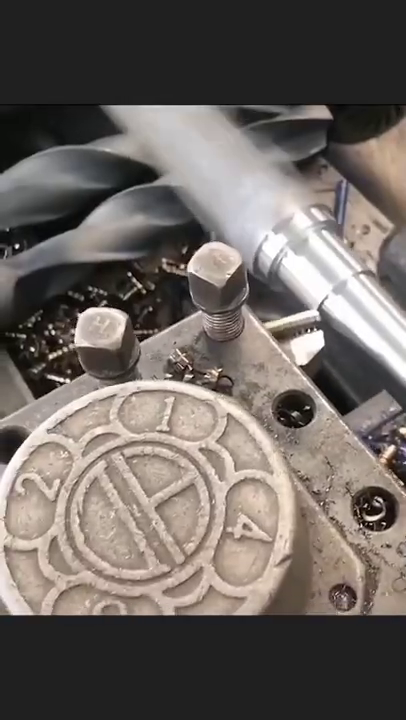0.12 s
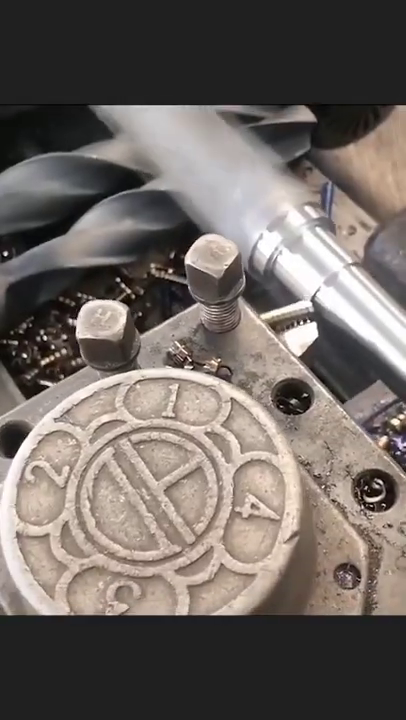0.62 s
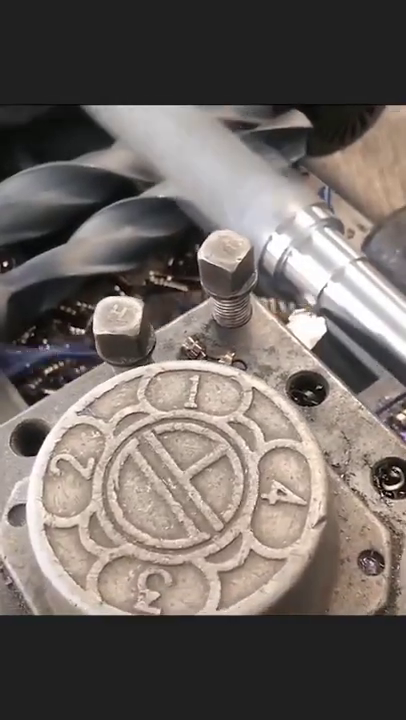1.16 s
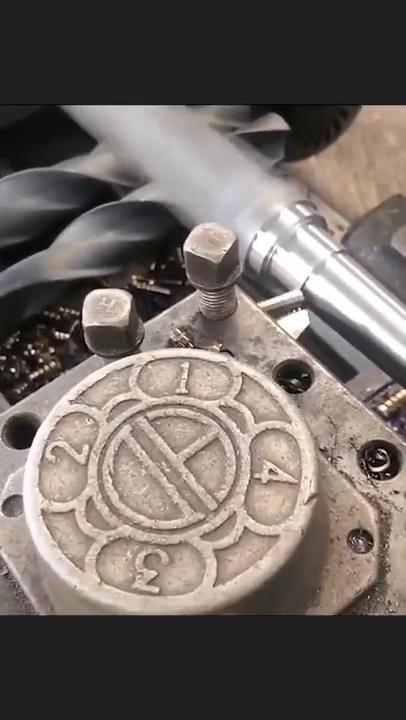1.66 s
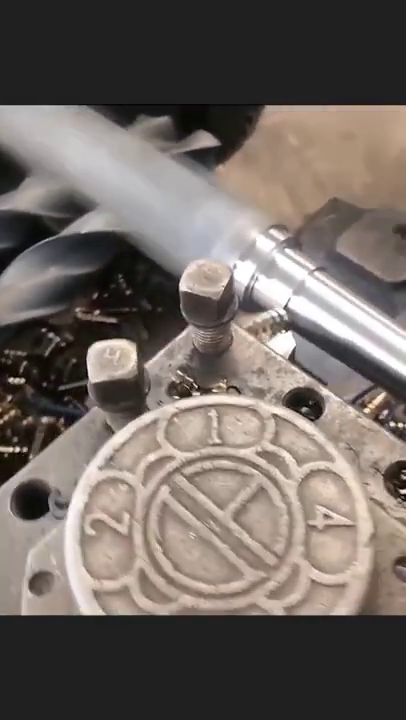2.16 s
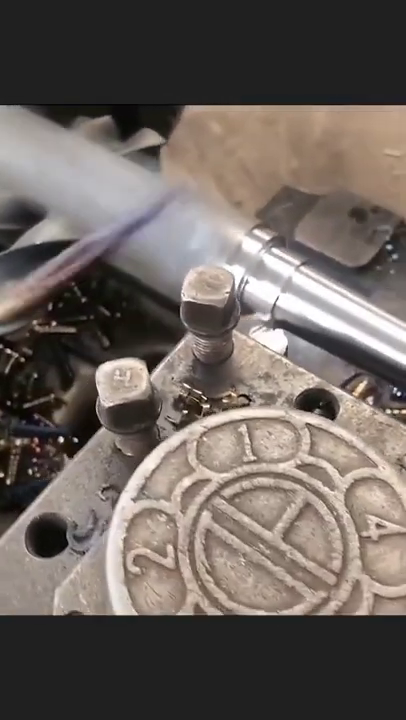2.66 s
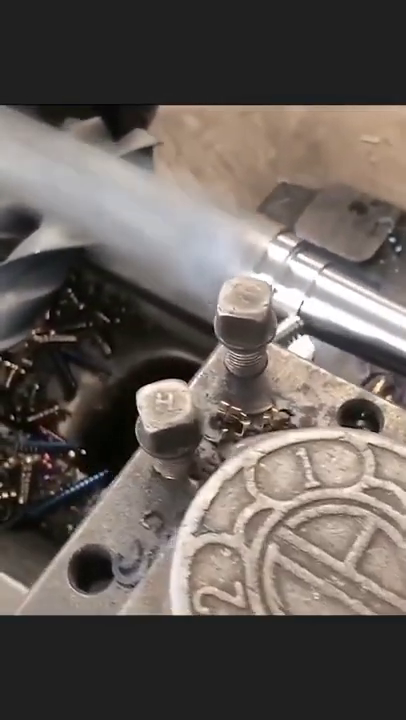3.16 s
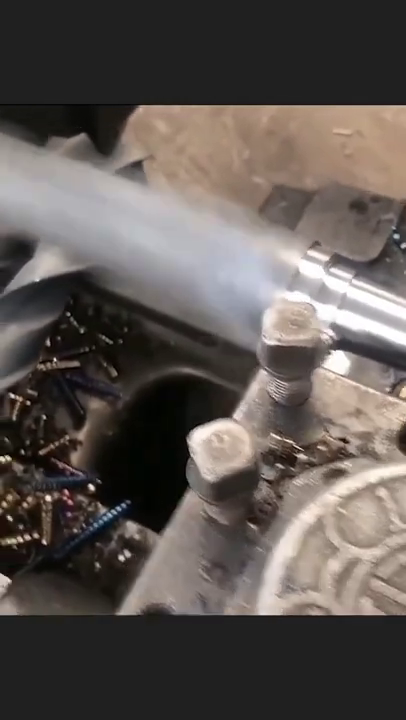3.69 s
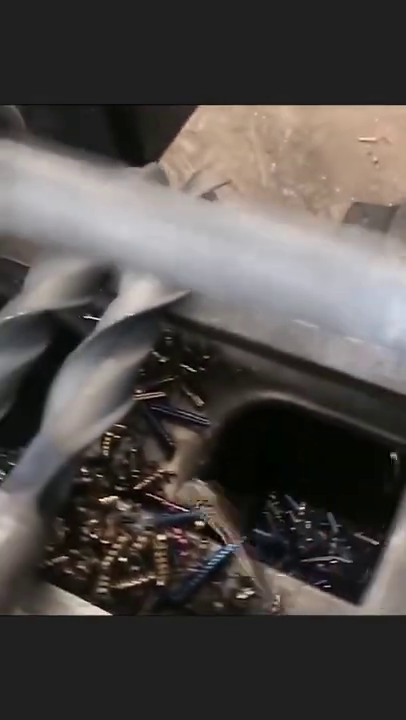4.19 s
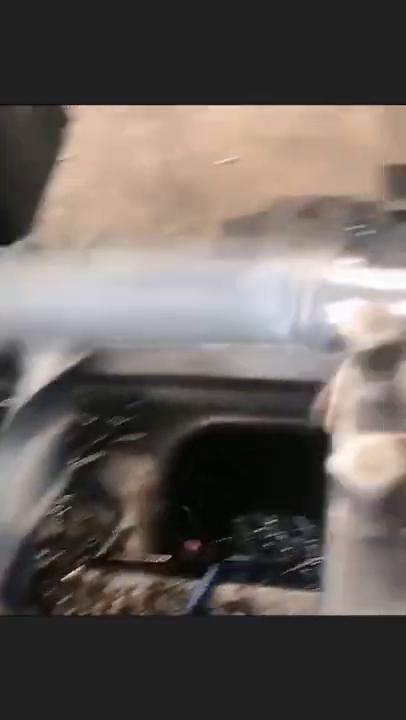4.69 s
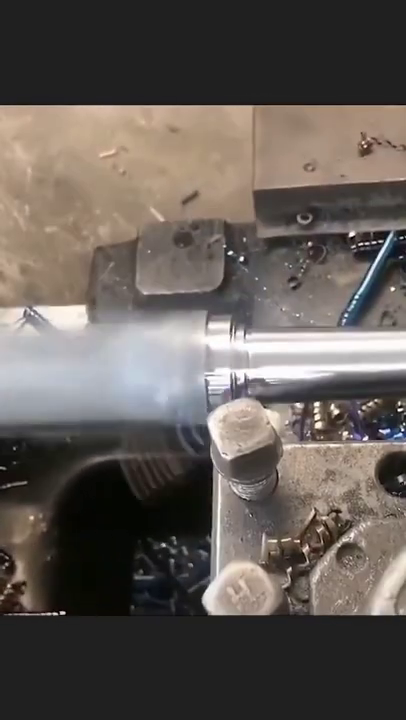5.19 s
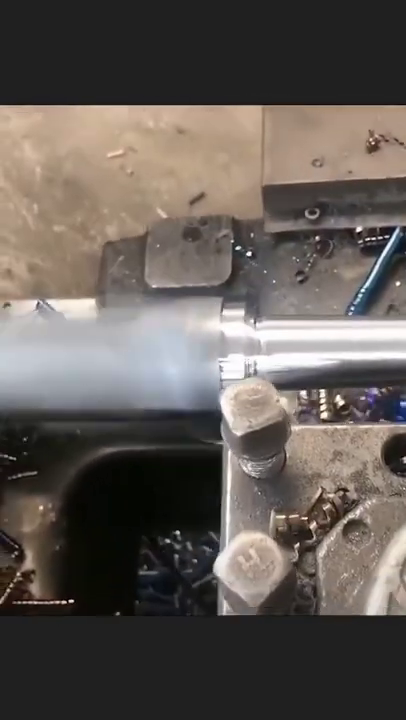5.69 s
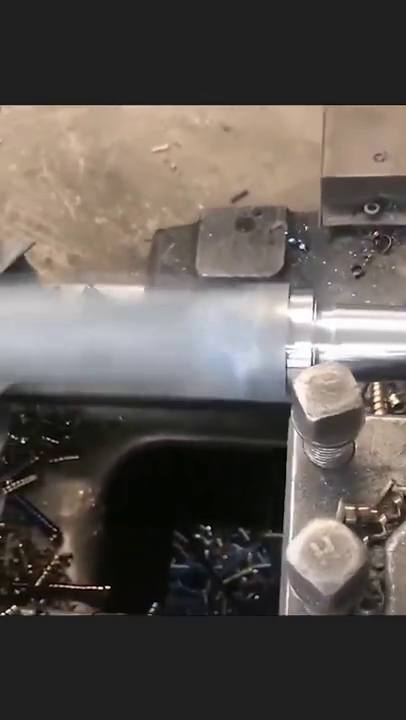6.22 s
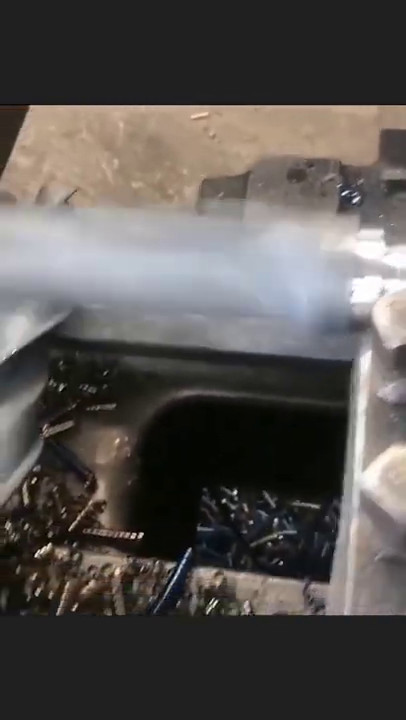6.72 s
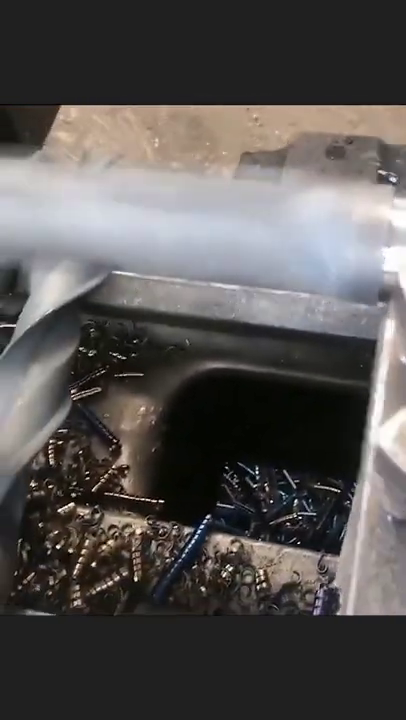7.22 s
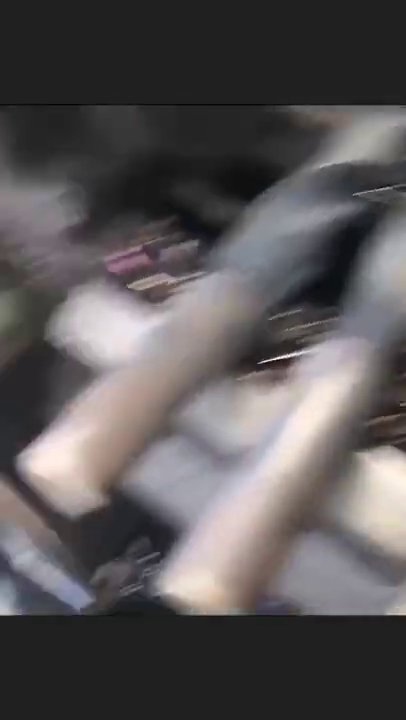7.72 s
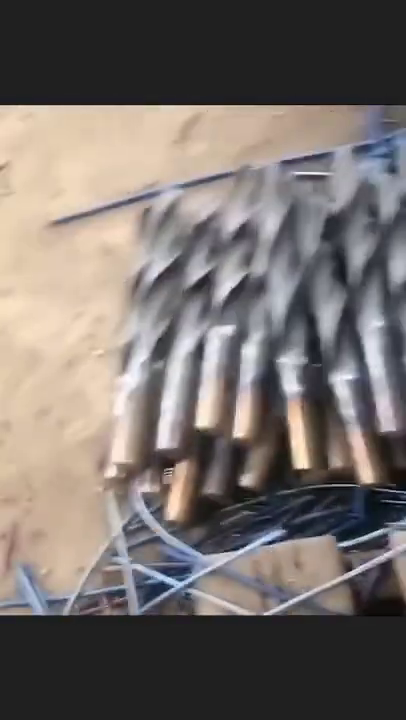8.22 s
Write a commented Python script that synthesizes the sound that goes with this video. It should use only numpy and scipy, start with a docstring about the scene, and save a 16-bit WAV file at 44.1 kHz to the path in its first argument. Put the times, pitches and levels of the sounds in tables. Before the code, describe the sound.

Close to a lathe in an industrial workshop, a tool squeals on a steel drill shank, very high and fast-throbbing, with sudden sharp bites. The squeal fades as machine roar and gear whine grow, then abruptly returns louder and steadier while the background drops. It stops quickly, leaving rumble, rattle and a few clinking chips; finally the shop grows louder with dull knocks and a ringing scrape.

```python
"""Lathe turning a steel drill shank

The tool squeals near 5 kHz, throbbing with the spindle and the two flutes of the drill; it fades, bites again
steadily and leaves the work. The squeal is a gliding carrier under a throb envelope with sudden bites on top.
Chips clink as decaying sines, loose parts rattle as noise bursts. Roar, casings, gear whines and a late
scrape are shaped noise and randomly pushed modes, held lower while the squeal is loud.
"""
import sys
import numpy as np
from scipy import signal
from scipy.fft import rfft, irfft
from scipy.io import wavfile
from scipy.ndimage import uniform_filter1d, minimum_filter1d

SR = 44100
rng = np.random.default_rng(int(sys.argv[2]) if len(sys.argv) > 2 else 0)


def master(y):
    """Save y as 16-bit WAV."""
    cut = np.clip(np.atleast_2d(y).T, -1, 1)
    pcm = np.round(cut * 32767)  # scale
    wavfile.write(sys.argv[1], SR, pcm.astype(np.int16))


def natural_amplitude(level_db):
    """Convert a level in decibels to a linear amplitude factor, elementwise."""
    exponent = np.asarray(level_db, float) / 20
    return 10 ** exponent


N = 368676  # samples, 8.36 s

# squeal: (time [s], pitch [Hz], level [dB])
SQUEAL = [(0.0, 5062, -14.5), (0.3, 5062, -15), (0.74, 5057, -17), (0.88, 5058, -11.5), (1.06, 5048, -17),
          (1.22, 5048, -14.5), (1.4, 5050, -17), (2.07, 5062, -18), (2.25, 5058, -19), (2.6, 5060, -19.5),
          (2.79, 5080, -27), (2.92, 5068, -19.5), (3.05, 5075, -24.5), (3.5, 5112, -27), (4.05, 5118, -29),
          (4.3, 5135, -27), (4.65, 5128, -32), (4.85, 5130, -31), (5.08, 5115, -37), (5.102, 4985, -8.5),
          (5.125, 4960, -8.5), (5.24, 4982, -8.5), (5.37, 4992, -8.5), (5.4, 5008, -8.5),
          (5.44, 4998, -8.5), (5.52, 4934, -8.5), (5.63, 4942, -8.5), (5.83, 4980, -8.5),
          (5.88, 4975, -8.5), (6.11, 5010, -9), (6.16, 5020, -10), (6.185, 5085, -12), (6.205, 5075, -25),
          (6.27, 5050, -36), (6.34, 5045, -47), (6.45, 5035, -50), (6.75, 5030, -61), (6.9, 5030, -90)]
# contact of tool and work: (time [s], throb depth [0-1], run-out share [0-1], unsteady share of ringing [0-1],
# pitch wobble scale [Hz], holder ring against the squeal [dB])
CONTACT = [(0, .24, .3, .1, 15, -23), (.9, .3, .3, .12, 19, -22), (1.3, .33, .6, .14, 16, -21),
           (1.9, .42, .75, .22, 17, -20), (2.2, .3, .3, .3, 19, -22), (2.7, .3, .6, .4, 18, -22),
           (3.4, .3, .4, .3, 17, -32), (5.08, .26, .4, .3, 16, -34), (5.1, .08, .3, .003, 9, -36),
           (5.4, .08, .3, .005, 9, -32), (5.6, .08, .3, .008, 5, -32), (6.05, .12, .3, .02, 9, -31),
           (6.17, .27, .3, .07, 12, -34), (6.21, .2, .3, .27, 10, -32), (6.3, .1, .3, 1, 3, -32)]
# unsteady ringing and drag: (time [s], offset from the squeal pitch [Hz], pitch sag on a bite [Hz])
DRAG = [(0, -15, 8), (.9, 0, 8), (2.2, 5, 8), (3.3, -35, 55), (5.08, -35, 55), (5.1, 0, 5), (8.36, 0, 5)]
# sudden bites of the tool: (time of peak [s], peak of envelope [dB])
BITES = [(0.053, -25), (0.096, -25.5), (0.169, -25), (0.242, -20), (0.421, -20), (0.794, -21),
         (0.837, -28.5), (0.863, -16.5), (0.904, -16), (0.932, -16.5), (1.127, -21), (1.160, -9.5),
         (1.201, -22), (1.273, -24.5), (1.528, -18.5), (1.645, -22), (1.791, -23.5), (1.865, -21.5),
         (1.958, -22.5), (2.111, -17.5), (2.159, -18.5), (2.221, -14.5), (2.276, -18.5), (2.3082, -22.5),
         (2.3484, -15), (2.372, -17), (2.394, -14.5), (2.417, -16), (2.462, -14), (2.487, -14.5),
         (2.527, -23), (2.5638, -16.5), (2.605, -17.5), (2.63, -12), (2.683, -13.5), (2.748, -14.5),
         (2.819, -14.5), (2.844, -10.5), (2.895, -16), (2.92, -17.5), (2.977, -14), (3, -10), (3.1156, -13),
         (3.158, -18), (3.188, -18.5), (3.22, -20), (3.2655, -17.5), (3.555, -24.5), (3.703, -17),
         (3.854, -22), (3.922, -28.5), (4.036, -25), (4.216, -24), (4.325, -27.5), (4.354, -27.5),
         (4.398, -25), (4.472, -26.5), (4.533, -29.5), (4.766, -28), (6.246, -21.5)]
# rubbing at the tool tip: (frequency [Hz], relative density [dB per Hz])
FIZZ = [(7500, -24), (8200, 0.5), (9700, -7.5), (11000, -22.5), (13500, -26.5), (14600, -12.5),
        (15550, -5.5)]
# hard spot passing the tool: turns counted from SNAG_S, envelope peak of each [dB]
SNAG_TURN = (-2, -1, 0, 1, 2, 3, 4, 6, 7, 8)
SNAG_DB = (-48, -43, -36, -45, -45, -45, -43, -41, -49, -51)
# clear chip clinks: (time [s], ring [Hz], level before rise and decay [dB])
CLEAR_CLINKS = [(6.98, 5800, -39), (6.99, 6200, -40), (7.0, 6050, -39), (7.03, 5960, -39),
                (7.07, 6300, -50), (6.99, 8100, -43), (7.595, 7610, -32), (7.6, 9050, -39),
                (7.6, 4800, -40), (8.225, 5150, -38)]
# rattle colour: (frequency [Hz], relative density [dB per Hz])
RATTLE_COLOUR = [(1500, -10), (2500, 4), (3000, 2), (3600, -5), (4300, -15), (6000, -32)]
# rattle level: (time [s], level against SHOP [dB])
RATTLE_LEVEL = [(0, -16), (2, -16), (3.9, -15), (4.3, -16.5), (5.08, -13), (5.2, -15.5), (6.2, -14),
                (7.5, -17.5), (8.36, -10.5)]
# dull knocks in the shop: (onset [s], peak of burst envelope [dB])
KNOCKS = [(7.745, -24), (7.762, -21), (7.795, -25), (8.149, -19)]
# reference level of the shop: (time [s], level [dB])
SHOP = [(0, -27), (1.55, -24.5), (2.2, -21), (3.05, -20.5), (3.95, -15.5), (5.0, -15.5), (5.085, -14),
        (5.115, -25.5), (5.9, -27.5), (6.45, -27.5), (7.95, -16.5), (8.36, -17.5)]
# machine noise spectra: (frequency [Hz], relative density [dB per Hz])
ROAR = [(240, -39), (400, -2), (484, -6.5), (580, -1.5), (719, 0.5), (994, 5), (1130, 4), (1700, 0.5),
        (1870, 4), (2240, -4), (2750, -5.5), (3850, -16), (7000, -56), (9100, -59), (15400, -120)]
RUMBLE = [(12, -59), (20, -23.5), (130, -12), (189, -4), (328, -2), (358, -2), (428, -6), (603, -1),
          (700, -11), (910, -30.5), (1540, -120)]
HISS = [(3290, -5.5), (5600, 1.5), (7300, -3.5), (8270, -0.5), (8860, -3), (10000, -3.5), (11500, -10),
        (11900, -11.5), (14600, -16.5), (15600, -25)]
# casings and gear meshes: (frequency [Hz], single-pole width [Hz], mid-turn level against SHOP [dB],
# half the gain on turning from lathe to shop [dB])
CASINGS = [(94, 67, -25.5, 0), (142, 47, -28.5, 6), (196.6, 20, -21.5, -1.5), (253.7, 19, -22, -4.5),
           (365.5, 35, -18, -0.5), (517.2, 57, -19.5, -8.5), (568.6, 60, -18, -1), (600, 12, -20.5, 3),
           (618.4, 17, -17.5, -2.5), (647, 23, -20.5, -1), (711, 63, -26.5, -7), (854, 30, -25, 10),
           (964, 76, -22, 4), (1023, 36, -15, 3.5), (1090, 16, -24.5, -5), (1230, 40, -13.5, 3.5),
           (1563, 52, -21, 5), (1692, 28, -18.5, 2), (2103, 59, -15.5, 1), (2240, 65, -20.5, -1.5),
           (2415, 56, -34.5, 14.5), (2840, 51, -24.5, -0.5), (2930, 60, -26, 5.5), (3180, 77, -33.5, 9.5),
           (3210, 1100, -35, -2.5), (3634, 120, -28.5, -0.5), (4050, 25, -43.5, 6), (4605, 670, -28, -7),
           (4880, 210, -31, -5.5), (5800, 200, -51, 3.5)]
# gear whines and broader casing rings: centre frequencies [Hz], single-pole widths [Hz]
DRIVE_HZ = (1409, 1834, 1985, 2680, 3770)
DRIVE_WIDTH_HZ = (14, 42, 80, 100, 220)
# their levels: (time [s], then the level of each against SHOP [dB])
DRIVE_LEVELS = [(0, -42, -29, -13, -22, -39), (1.2, -25, -28, -12.5, -28, -35),
                (2.2, -18, -16, -13.5, -31, -30), (3.5, -32, -10, -8.5, -18, -30),
                (4.4, -20, -9.5, -16, -17.5, -20), (5.1, -22.5, -10, -14, -16, -25.5),
                (5.5, -20.5, -13.5, -22.5, -25.5, -30), (6.4, -23, -9.5, -10, -18.5, -33),
                (7.1, -34, -10, -8, -21, -36), (7.4, -25, -11, -10, -18, -36),
                (7.7, -16, -13, -5, -13, -38), (7.85, -8, -10.5, -17, -11, -38),
                (8.36, -17, -6, -10.5, -15, -38)]
# scrape across the shop: band centres [Hz], median levels against SHOP once risen [dB]
SCRAPE_HZ = (4100, 4550, 4950, 5400, 5900, 6400, 8500, 10500)
SCRAPE_DB = (-33, -27.5, -39.5, -33, -43, -34.5, -40, -39.5)

SPINDLE_HZ, SECOND_CUT_S, SECOND_CUT_TURN = 13.57, 5.09, 0.325
BITE_WIDTH_S = 0.012  # full width at half height
LOOSE_WIDTH_HZ, HOLDER_WIDTH_HZ, UPPER_WIDTH_HZ = 125, 190, 110  # single-pole widths
UPPER_DB, LEAVES_S, UPPER_FADE_DB_PER_S = -60, 6.25, 83  # UPPER_DB: at a squeal of -15.5 dB
SNAG_S, SNAG_HZ, SNAG_TURNS = 5.515, 4460, 0.17  # SNAG_TURNS: half width at 1/e
CLINK_LOW_HZ, CLINK_HIGH_HZ, CLINK_T60_S, CLINK_COUNT = 4300, 10000, 0.079, 260
CLINK_DB, CLINK_SPREAD_DB = -31, 9  # floor against SHOP before rise, decay and dip; range above it
RATTLE_PER_S, RATTLE_SPREAD_DB, RATTLE_DECAY_S = 1500, 1.5, 0.0012
RUMBLE_DB, HISS_DB = -7.5, -26  # against SHOP, hiss before its dip
DIP_FROM_S, DIP_TO_S, DIP_DB = 5.1, 6.3, -17.5  # hiss and random clinks are lower here
SCRAPE_SHARPNESS, SCRAPE_FROM_S, SCRAPE_RISE_S = 11, 7.5, 0.3  # sharpness: Hz over single-pole width
ROOM_T60_S, ROOM_DB = 0.62, -24
CEILING = 0.8


def seconds():
    """Time of every sample."""
    return np.arange(N) / SR


def curve(table):
    """Columns of a (time [s], ..) table, interpolated to one value a sample."""
    s, *columns = np.transpose(table)
    return [np.interp(seconds(), s, column) for column in columns]


def unit(x):
    """Scale to rms 1."""
    return x / np.sqrt(np.mean(np.abs(x) ** 2))


def walk(rate_hz):
    """Random levels held for 1 / rate_hz and slewed twice; rms near 1."""
    k = int(SR / rate_hz)
    held = np.repeat(rng.standard_normal(N // k + 1), k)
    return unit(uniform_filter1d(uniform_filter1d(held, k), k)[:N])


def coloured(points, flicker_db, rate_hz):
    """Noise of rms 1 from a (Hz, dB) spectrum; octaves flicker partly alone, partly together."""
    hz = np.maximum(np.arange(N // 2 + 1) * SR / N, 1)
    point_hz, point_db = np.transpose(points)
    shape = natural_amplitude(np.interp(np.log(hz), np.log(point_hz), point_db, left=-99, right=-99))
    spectrum = shape * rfft(rng.standard_normal(N))
    together, out = walk(rate_hz), 0
    for octave in range(4, 15):
        band = np.cos(np.pi / 2 * np.clip(np.log2(hz) - octave, -1, 1)) ** 2
        if np.any(band * shape > 1e-4):
            flicker = natural_amplitude(flicker_db * (0.7 * together + 0.45 * walk(rate_hz)))
            out = out + irfft(spectrum * band, N) * flicker
    return unit(out)


def sway(width_hz):
    """Complex envelope of a randomly pushed mode: two equal poles, each width_hz wide."""
    pole = np.exp(-np.pi * width_hz / SR)
    push = rng.standard_normal(N) + 1j * rng.standard_normal(N)
    once = signal.lfilter([1], [1, -pole], push)
    return unit(signal.lfilter([1], [1, -pole], once))


def tone(hz, envelope):
    """Carrier on a moving pitch, rms 1 for an envelope of 1."""
    phase = 2 * np.pi * np.cumsum(hz * np.ones(N)) / SR
    return np.sqrt(2) * np.real(envelope * np.exp(1j * phase))


def flute_throb(angle, depth, runout):
    """Swell as two flutes a turn pass, one cutting deeper, each pass biting a little differently."""
    throb = np.cos(2 * angle + 3.0) + runout * np.cos(angle - 2.6)
    throb = throb + 0.29 * np.cos(3 * angle + 0.6) + 0.15 * np.cos(4 * angle + 2.0)
    throb = throb + 0.25 * walk(45) + 0.38 * walk(120)
    swell = np.clip(1 + depth * throb, 0.08, 3)
    # hold the power over a turn
    return swell / np.sqrt(uniform_filter1d(swell ** 2, int(SR / SPINDLE_HZ)))


def squeal():
    """The tool's bending mode sings with the flutes; a holder mode and an upper partial follow it."""
    t = seconds()
    hz, db = curve(SQUEAL)
    depth, runout, loose, wobble_hz, holder_db = curve(CONTACT)
    loose = np.clip(loose, 0, 1)
    offset_hz, bite_sag_hz = curve(DRAG)
    first_cut = t < SECOND_CUT_S

    turn = SPINDLE_HZ * t + np.where(first_cut, 0, SECOND_CUT_TURN) + 0.03 * walk(9)
    angle = 2 * np.pi * turn
    swell = flute_throb(angle, depth, runout)

    unsteady = sway(LOOSE_WIDTH_HZ) * np.exp(2j * np.pi * np.cumsum(offset_hz) / SR)
    ringing = np.sqrt(1 - loose) + np.sqrt(loose) * unsteady
    bite = sum(natural_amplitude(peak_db) * np.exp(-np.log(16) * ((t - s) / BITE_WIDTH_S) ** 2) for s, peak_db in BITES)
    envelope = natural_amplitude(db) * swell * ringing + bite

    # pitch wobbles with the flutes and sags on a bite, about its power-weighted mean over a turn
    lead = np.where(first_cut, -0.6, -1.9)
    wobble = np.cos(2 * angle + lead) + 0.5 * np.cos(angle + lead)
    wobble = wobble + 0.35 * np.cos(4 * angle + lead) + 0.25 * walk(60)
    sag_hz = bite_sag_hz * bite / (bite + natural_amplitude(db)) - wobble_hz * wobble
    mean_sag_hz = uniform_filter1d(sag_hz * swell ** 2, int(SR / SPINDLE_HZ))
    main = tone(hz - sag_hz + mean_sag_hz + 4 * walk(40), envelope)

    holder_envelope = natural_amplitude(holder_db) * (natural_amplitude(db) * swell + bite) * sway(HOLDER_WIDTH_HZ)
    holder = tone(hz + np.where(first_cut, 205, 200), holder_envelope)

    upper_db = UPPER_DB + 0.12 * (db + 15.5) - UPPER_FADE_DB_PER_S * np.maximum(t - LEAVES_S, 0)
    upper = tone(11260 + 0.9 * (hz - 5055), natural_amplitude(upper_db) * swell * (0.41 + sway(UPPER_WIDTH_HZ)))
    return main + holder + upper


def fizz():
    """Rubbing at the tool tip: treble noise following the squeal level."""
    _, db = curve(SQUEAL)
    return natural_amplitude(1.1 * db - 44) * coloured(FIZZ, flicker_db=0.8, rate_hz=19)


def snag():
    """A hard spot chirps upward as it passes the tool on the listed turns."""
    turns = (seconds() - SNAG_S) * SPINDLE_HZ
    envelope = sum(natural_amplitude(peak_db) * np.exp(-((turns - k) / SNAG_TURNS) ** 2)
                   for k, peak_db in zip(SNAG_TURN, SNAG_DB))
    chirp_hz = 250 * ((turns + 0.5) % 1 - 0.5)
    return tone(SNAG_HZ + chirp_hz + 30 * walk(29), envelope)


def clinks(level_db):
    """Curled chips drop into the tray: sines with a soft rise and a short decay."""
    chance = rng.random((CLINK_COUNT, 3))
    start_s = chance[:, 0] * N / SR
    ring_hz = CLINK_LOW_HZ * (CLINK_HIGH_HZ / CLINK_LOW_HZ) ** chance[:, 1]
    db = level_db[(chance[:, 0] * N).astype(int)] + CLINK_DB + CLINK_SPREAD_DB * chance[:, 2] ** 2
    t = np.arange(SR // 5) / SR
    envelope = (1 - np.exp(-t / 0.003)) * np.exp(-np.log(1000) * t / CLINK_T60_S)
    out = np.zeros(N + SR)
    for s, hz, clink_db in list(zip(start_s, ring_hz, db)) + CLEAR_CLINKS:
        i = int(s * SR)
        out[i:i + len(t)] += natural_amplitude(clink_db) * np.sin(2 * np.pi * hz * t) * envelope
    return out[:N]


def rattle(shop_db):
    """Loose parts and chips: dense ticks and a few knocks as bursts of coloured noise."""
    ticks = (rng.random(N) < RATTLE_PER_S / SR) * natural_amplitude(RATTLE_SPREAD_DB * rng.exponential(size=N))
    knocks = np.zeros(N)
    for s, peak_db in KNOCKS:
        knocks[int(s * SR)] = natural_amplitude(peak_db)
    age = np.arange(SR // 50) / SR / RATTLE_DECAY_S
    burst = (age / 2) ** 2 * np.exp(2 - age)  # soft rise to 1, then decay
    level_db, = curve(RATTLE_LEVEL)
    dense = unit(signal.fftconvolve(ticks, burst)[:N]) * natural_amplitude(shop_db + level_db)
    envelope = dense + signal.fftconvolve(knocks, burst)[:N]
    return envelope * coloured(RATTLE_COLOUR, flicker_db=0.6, rate_hz=8.8)


def casings(load):
    """Casings and gear meshes ring as randomly pushed modes; their balance turns from lathe to shop."""
    away = np.interp(seconds(), (1.5, 7.8), (-1, 1))  # -1 facing the lathe, 1 facing the shop
    out = 0
    for hz, width_hz, db, turn_db in CASINGS:
        level_db = db + turn_db * away + 1.3 * walk(2.63) + 1.23 * walk(14) + 0.47 * load
        out = out + tone(hz * (1 + 0.003 * walk(1.5)), natural_amplitude(level_db) * sway(width_hz))
    return out


def whines_and_rings(load):
    """Gear whines and broader casing rings: pushed modes, each with its own level curve, shaken by load."""
    out = 0
    for hz, width_hz, db in zip(DRIVE_HZ, DRIVE_WIDTH_HZ, curve(DRIVE_LEVELS)):
        level_db = db + walk(25) + 0.45 * load
        out = out + tone(hz * (1 + 0.003 * walk(3)), natural_amplitude(level_db) * sway(width_hz))
    return out


def scrape():
    """A rough, ringing hiss from across the shop swells at the end: flickering modes."""
    rise = np.clip((seconds() - SCRAPE_FROM_S) / SCRAPE_RISE_S, 0, 1)
    out = 0
    for hz, db in zip(SCRAPE_HZ, SCRAPE_DB):
        out = out + tone(hz, rise * natural_amplitude(db + 3.2 * walk(25)) * sway(hz / SCRAPE_SHARPNESS))
    return out


def machines(shop_db, hiss_db):
    """Roar, rumble and hiss as coloured noise, with the modes and the scrape, at the shop level."""
    load = walk(22) + walk(12)  # uneven load shakes the whole drive at once
    roar = coloured(ROAR, flicker_db=0.94, rate_hz=7.4) * natural_amplitude(-3.5 + 0.53 * load)
    rumble = natural_amplitude(RUMBLE_DB) * coloured(RUMBLE, flicker_db=0.57, rate_hz=5.1)
    hiss = natural_amplitude(hiss_db) * coloured(HISS, flicker_db=1.0, rate_hz=45)
    modes = casings(load) + whines_and_rings(load)
    return natural_amplitude(shop_db) * (roar + modes + rumble + hiss + scrape())


def room(x):
    """Shop walls: convolution with a decaying noise tail."""
    t = np.arange(SR) / SR
    tail = rng.standard_normal(SR) * np.exp(-np.log(1000) * t / ROOM_T60_S)
    tail = tail / np.sqrt(np.sum(tail ** 2))
    return natural_amplitude(ROOM_DB) * signal.fftconvolve(x, tail)[:N]


def scene():
    """Tool and chips in front with room tail, shop around; one channel."""
    t = seconds()
    shop_db, = curve(SHOP)
    dipped = 1.0 * (t > DIP_FROM_S) * (t < DIP_TO_S)
    dip_db = DIP_DB * uniform_filter1d(dipped, size=2000)
    tool = squeal() + fizz() + snag() + clinks(shop_db + dip_db)
    mix = tool + room(tool) + rattle(shop_db) + machines(shop_db, HISS_DB + dip_db)
    return mix[None]


def roll_off(x):
    """The treble ends steeply here."""
    return signal.sosfilt(signal.butter(12, 15560, fs=SR, output="sos"), x)


def record(dry):
    """Limiter: turns the loudest peaks down smoothly."""
    gain = np.minimum(1, CEILING / (np.abs(dry) + 1e-9))
    gain = uniform_filter1d(minimum_filter1d(gain, size=401), size=201)
    return roll_off(gain * dry)


dry = scene()
out = record(dry)
master(out)
```